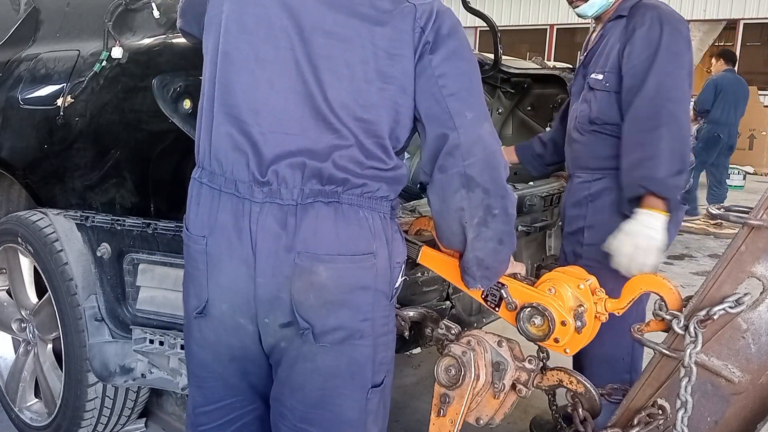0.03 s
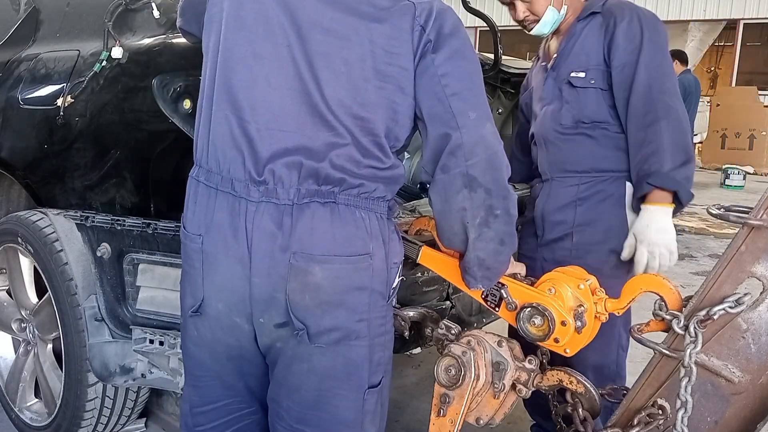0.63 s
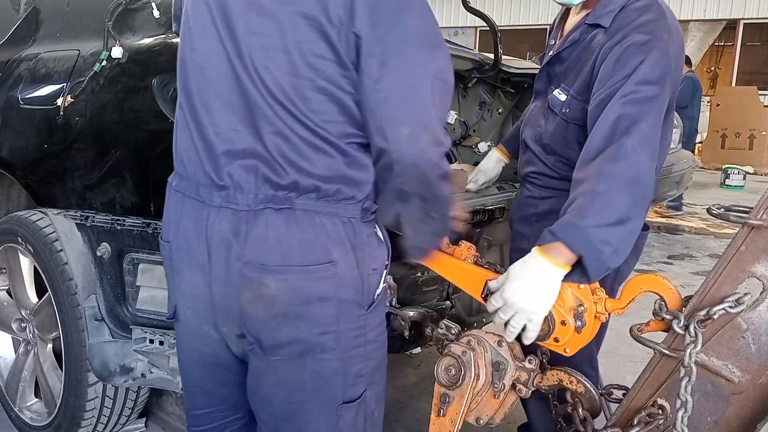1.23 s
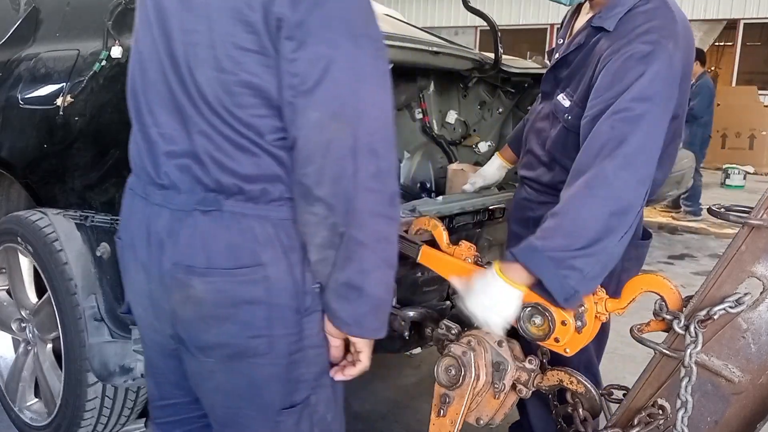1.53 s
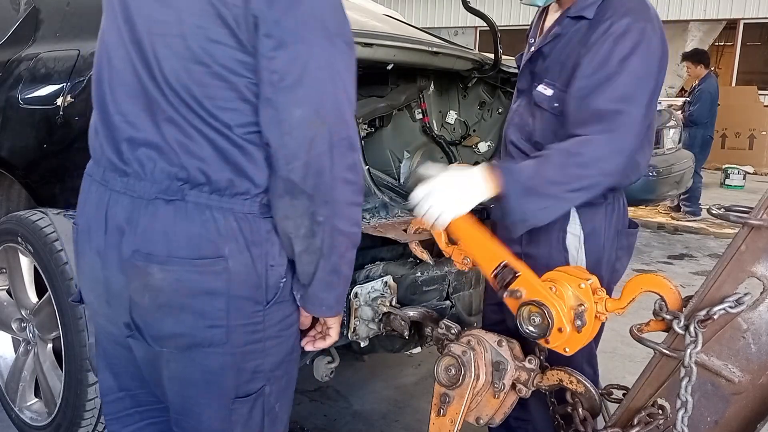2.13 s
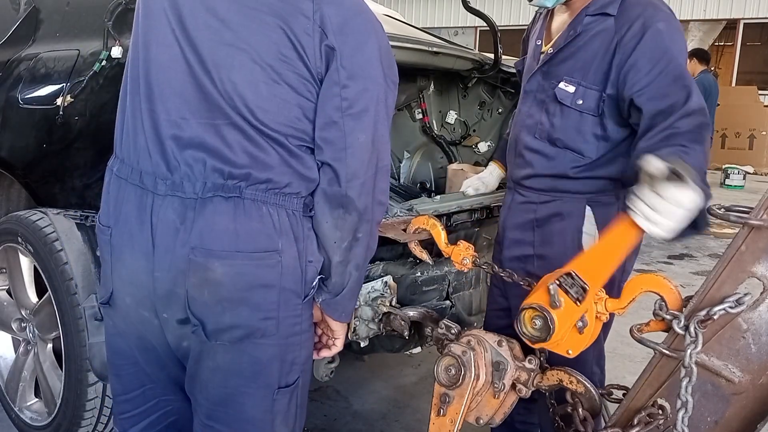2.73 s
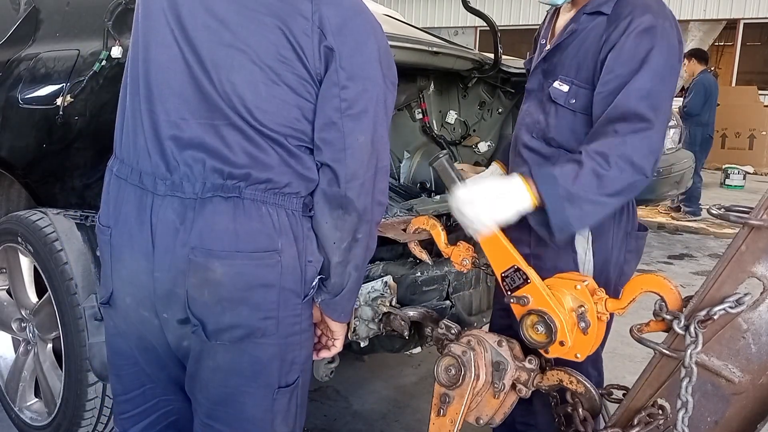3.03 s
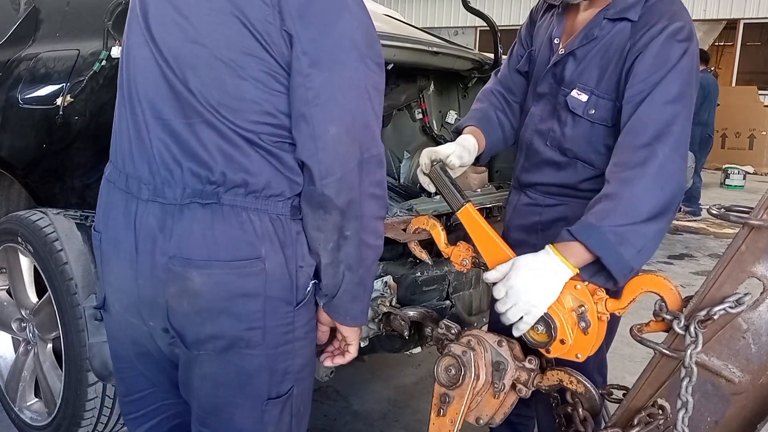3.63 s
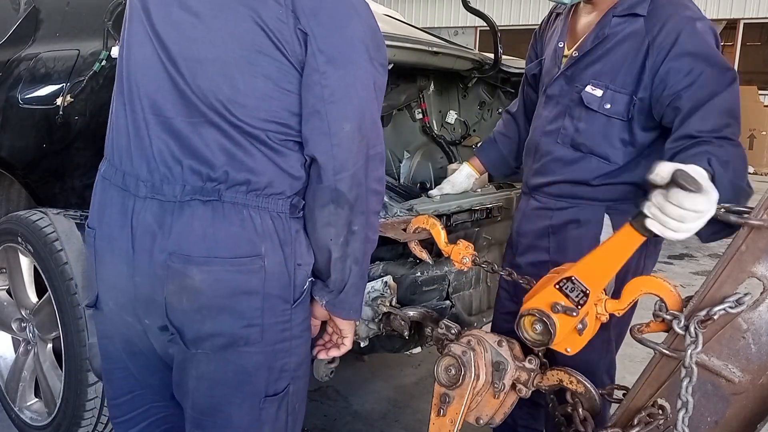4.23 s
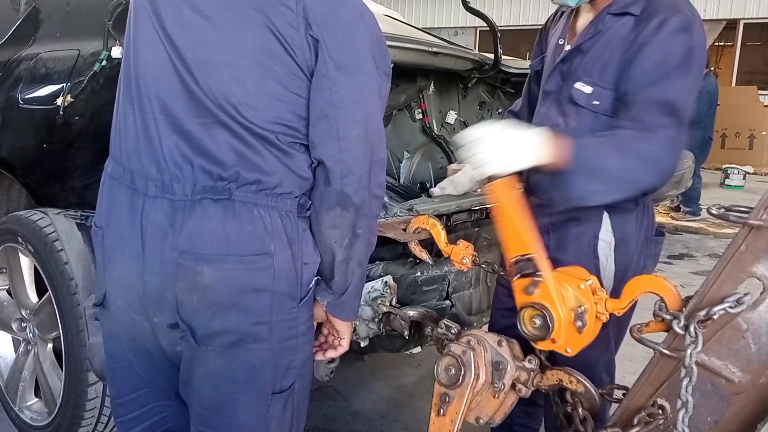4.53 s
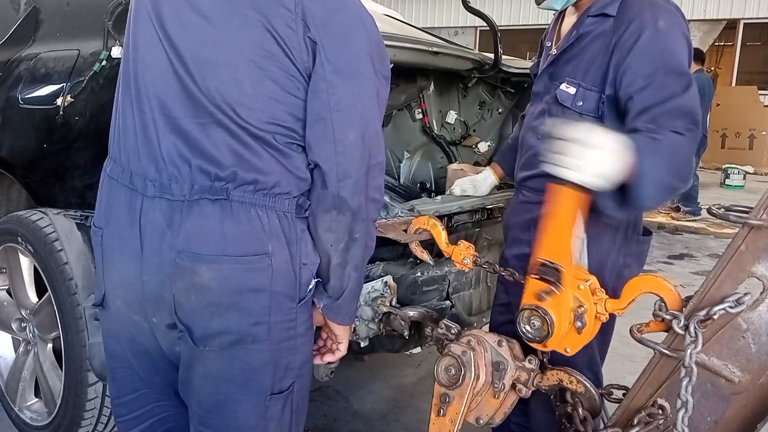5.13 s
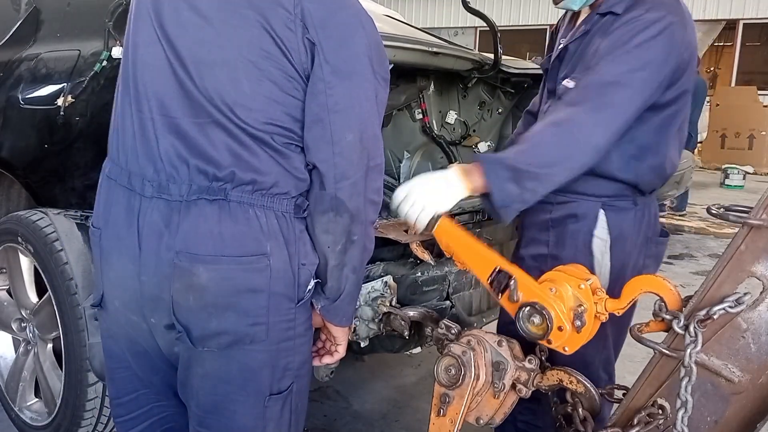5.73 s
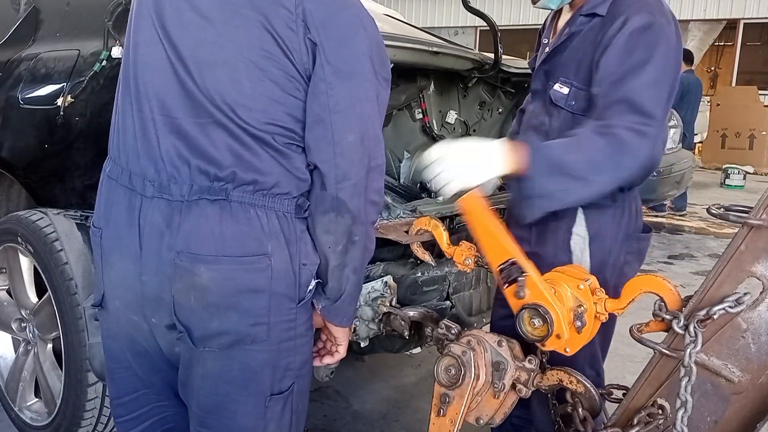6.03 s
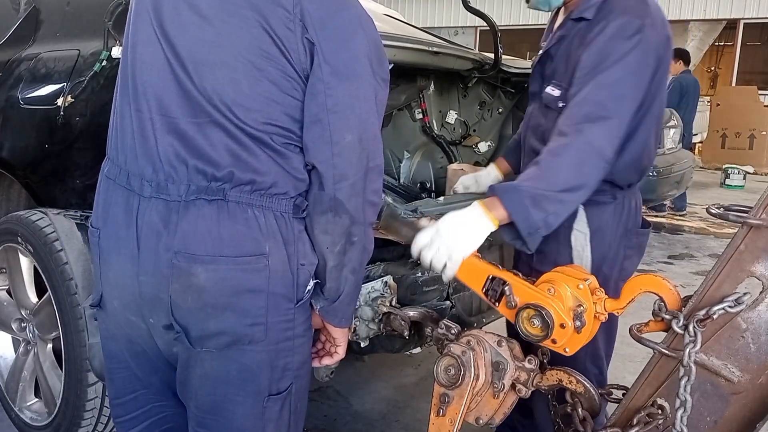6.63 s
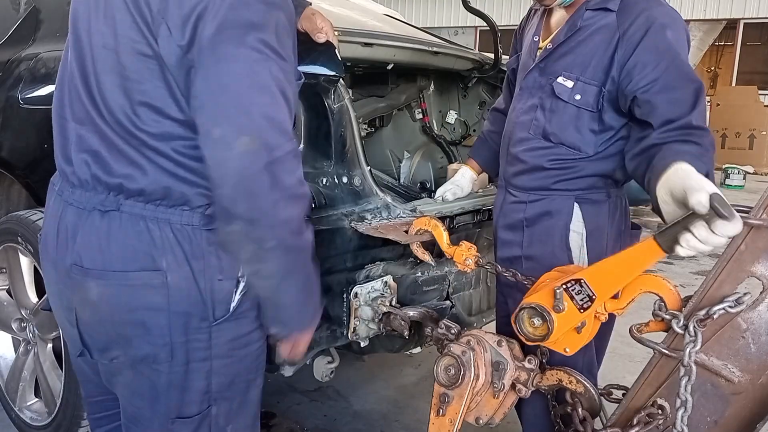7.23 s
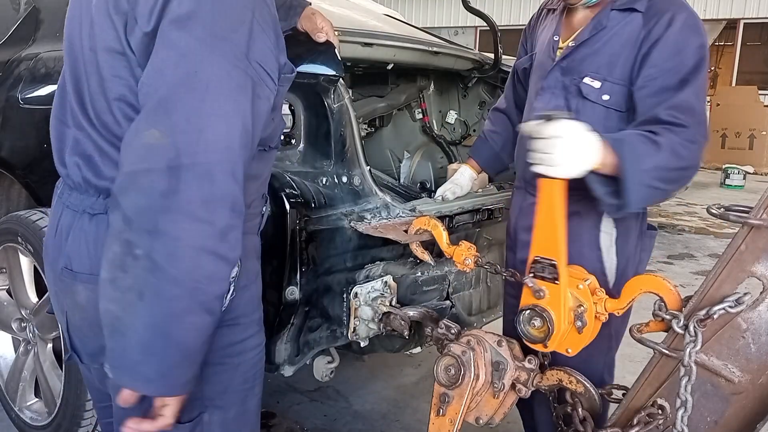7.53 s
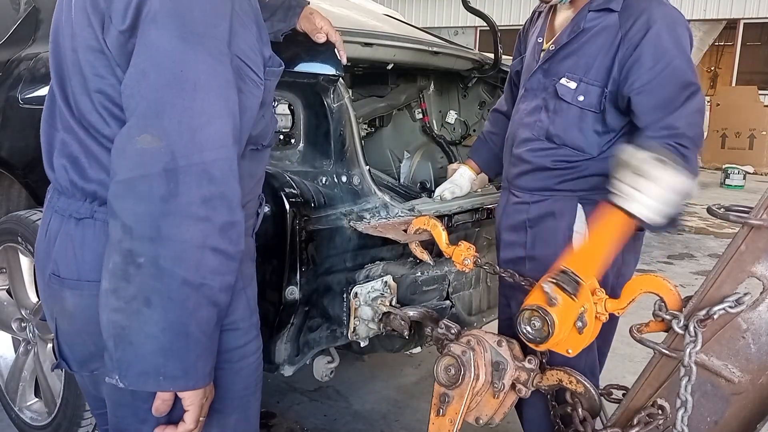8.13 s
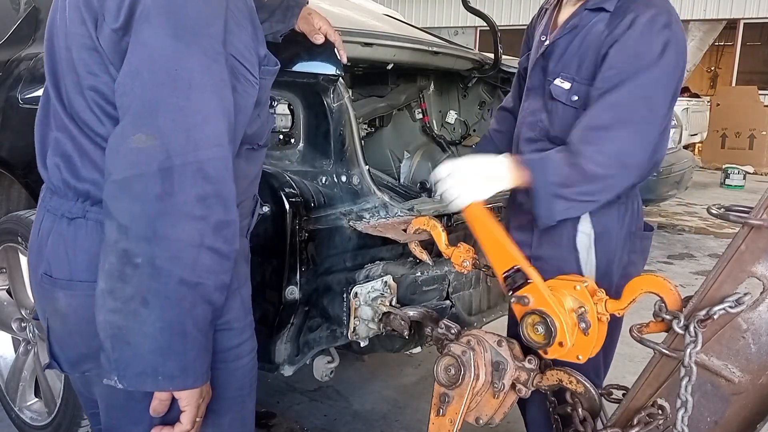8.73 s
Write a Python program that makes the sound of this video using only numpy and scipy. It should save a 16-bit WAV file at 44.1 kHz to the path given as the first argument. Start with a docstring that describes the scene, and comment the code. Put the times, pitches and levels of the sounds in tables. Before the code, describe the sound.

Over the steady drone of a workshop fan, distant hammer blows on sheet metal come in small groups. A hand hoist beside the microphone starts ratcheting in irregular bursts of clicks and gritty rubs, with occasional dull thuds and two thin squeaks. Compressed air hisses for a few seconds, the hammering stops, and three chattering steel clangs ring through the hall while the ratchet keeps clicking.

```python
"""A lever hoist is cranked close by in a car body shop: its pawl snaps over the ratchet teeth in short,
uneven runs, and steel rubs on steel as the lever swings. Further off in the hall a hammer beats a
sheet-metal panel, and later a loose steel part clangs three times and chatters.
Soft, heavy contacts give a few dull knocks, and dry metal sticks and slips in two thin squeaks.
A fan drones throughout, and compressed air hisses while a valve is open."""
import sys
import numpy as np
from scipy import signal
from scipy.fft import rfft, irfft, next_fast_len
from scipy.io import wavfile
from scipy.ndimage import uniform_filter1d

SR = 44100
rng = np.random.default_rng(int(sys.argv[2]) if len(sys.argv) > 2 else 0)


def generate_wav(signal):
    """Clip the signal to [-1, 1] and save it as 16-bit WAV at the path in sys.argv[1]."""
    frames = np.transpose(np.atleast_2d(signal))
    scaled = np.clip(frames, -1, 1) * 32767
    pcm = np.round(scaled).astype(np.int16)
    wavfile.write(sys.argv[1], SR, pcm)


N = 396018


def undb(db):
    """Decibels to gain."""
    return 10 ** (np.asarray(db) / 20)


def unit(x):
    """Scale to rms 1."""
    return x / np.sqrt(np.mean(x ** 2))


def along(hz, points):
    """Read (Hz, value) points on a log-frequency axis."""
    f, value = np.transpose(points)
    return np.interp(np.log(hz + 1), np.log(f), value)


def bins(size):
    """Frequencies of a spectrum of size samples."""
    return np.arange(size // 2 + 1) * SR / size


def vibration(size, colour, modes=()):
    """Countless modes in random phase, rms 1, with a few (Hz, width Hz, dB) resonances standing out."""
    hz = bins(size)
    peaks_db = sum(peak / (1 + (2 * (hz - f) / width) ** 2) for f, width, peak in modes)
    phases = np.exp(2j * np.pi * rng.random(len(hz)))
    return unit(irfft(undb(along(hz, colour) + peaks_db) * phases, size))


def eq(x, points):
    """Shape the tone with (Hz, dB) points."""
    return irfft(rfft(x) * undb(along(bins(len(x)), points)), len(x))


def fade(t, t60):
    """Hold at full level until t = 0, then decay exponentially."""
    return np.exp(-np.log(1000) * np.maximum(t, 0) / t60)


def swell(t, rise):
    """Smooth attack over about rise seconds."""
    return 1 - np.exp(-(t / max(rise, 1e-4)) ** 2)


def wander(size, rate):
    """Glide to a new random value every 1 / rate s; rms 1."""
    step = max(int(SR / rate), 1)
    held = np.repeat(rng.standard_normal(size // step + 1), step)
    return unit(uniform_filter1d(held, step)[:size])


def rattle(size, rate, depth_db):
    """Uneven metal contact: the force jumps from one tiny impact to the next."""
    return unit(undb(depth_db * wander(size, rate)))


def add(track, s, sound):
    """Mix a sound in at time s."""
    i = int(s * SR)
    track[i:i + len(sound)] += sound[:N - i]


# reverb time of the hall: (frequency [Hz], t60 [s])
HALL_T60 = [(100, 0.51), (400, 0.68), (1500, 0.79), (4000, 0.81), (8000, 0.37), (15000, 0.41)]

def hall(x):
    """Let a vibration die away in the hall, octave by octave: the top end goes first."""
    t, spectrum = np.arange(len(x)) / SR, rfft(x)
    centres = 62.5 * 2 ** np.arange(9)
    octave = np.log2(np.clip(bins(len(x)), centres[0], centres[-1]))
    out = np.zeros(len(x))
    for hz in centres:
        band = np.maximum(1 - abs(octave - np.log2(hz)), 0)
        out += irfft(spectrum * band, len(x)) * fade(t, along(hz, HALL_T60))
    return out


# tone of the fan: (frequency [Hz], level [dB])
FAN_COLOUR = [(30, -17), (120, -12), (205, -15.5), (300, -6.5), (376, 6.5), (430, -5.5), (570, -8),
              (1000, -17), (1200, -20.5), (2000, -22), (6300, -19.5), (8000, -26), (13500, -31),
              (16000, -28)]
# duct resonances: (frequency [Hz], width [Hz], boost [dB])
DUCT_MODES = [(484, 39, 9.5), (1400, 78, 8.5), (2920, 130, 12.5), (6660, 690, 8), (9300, 830, 8)]

def fan(level_db=-46.5):
    """A fan drones in its duct: a steady bed under the scene."""
    return vibration(next_fast_len(N, True), FAN_COLOUR, DUCT_MODES)[:N] * undb(level_db)


# air jets: (valve opens [s], valve closes [s], level [dB])
AIR_JETS = [(0, 3.3, -63), (1.0, 3.62, -54), (4.575, 7.245, -41)]
# tone of the hiss: (frequency [Hz], level [dB])
AIR_COLOUR = [(50, -33), (200, -9), (800, -5), (2000, -15), (4000, -7.5), (6600, 2), (8000, -3), (9500, 1),
              (11500, -9.5), (14000, -6), (16000, -3)]

def compressed_air():
    """A fluttering hiss builds as the valve opens and dies as the hose empties."""
    t = np.arange(N) / SR
    jets = [undb(db) * swell(np.maximum(t - opens, 0), rise=0.03) * fade(t - closes, t60=0.2)
            for opens, closes, db in AIR_JETS]
    flow = np.linalg.norm(jets, axis=0)  # overlapping jets add in power
    flutter = undb(0.67 * wander(N, rate=8.2))
    return vibration(next_fast_len(N, True), AIR_COLOUR)[:N] * flow * flutter


def struck_spot(x, spacing_hz, depth_db):
    """The spot that is struck favours some groups of modes and misses others."""
    count = int(SR / spacing_hz)
    db = np.interp(bins(len(x)), np.linspace(0, SR, count), depth_db * rng.standard_normal(count))
    return unit(irfft(rfft(x) * undb(db), len(x)))


# hammer hits, voiced by the spot struck: (time [s], level [dB], boom trim [dB], crack trim [dB])
BLOWS = [(0.0568, -24.5, -3.5, 0.5), (0.2423, -25.5, 2, 3), (0.4279, -28.5, 3, 4.5), (2.0255, -22, 1, -3),
         (2.213, -22, -1.5, -4), (2.3536, -21.5, -1.5, -3.5), (2.66, -24, -1, 2.5),
         (2.9093, -23.5, -2.5, 2), (3.0489, -25.5, -2, 3), (3.186, -21.5, -1.5, -4.5), (3.7, -26, -7, -1),
         (3.977, -20.5, -7.5, -4), (4.226, -21.5, -6.5, -0.5), (4.275, -23.5, -8, -2.5),
         (4.9566, -23.5, 0, 0.5), (5.1382, -24, 1.5, 0), (5.3509, -25.5, 4.5, 3.5), (5.6199, -25.5, 0, 0),
         (5.7716, -21.5, -2.5, -7), (5.9828, -22.5, -2, 0.5)]
# tone of the sheet metal: (frequency [Hz], level [dB])
PANEL_COLOUR = [(21, -51), (35, -13.5), (140, -3), (301, 1), (431, -3), (529, -3.5), (702, -12),
                (1060, -14), (1270, -16), (2220, -15), (6360, -19.5), (9580, -26.5), (13000, -46),
                (14800, -37), (16000, -40)]
# panel resonances: (frequency [Hz], width [Hz], boost [dB])
PANEL_MODES = [(146.3, 23, 10.5), (212, 33, 5.5), (281, 39, 5), (356, 17, 3.5), (437, 61, -5),
               (485, 19, 0.5), (650, 37, 4), (766, 36, 5), (871, 41, 6.5), (962, 63, 2), (980, 15, 2.5),
               (1071, 40, 7.5), (1530, 45, 4), (1660, 38, 5.5), (2280, 140, 2.5), (3070, 280, 1),
               (6300, 510, 5)]

def hammer(size=32768, attack_s=0.0064):
    """Each blow cracks, the panel swells and booms a little later, and its ring hangs in the hall."""
    out, t = np.zeros(N), np.arange(size) / SR
    crack_colour = [(100, -25), (500, -34), (2000, 3), (4000, 7.5), (7000, 1),
                    (10000, -3.5), (16000, -20)]
    boom_colour = [(30, -40), (70, -21), (130, 3.5), (300, 10.5), (700, -40), (2000, -45)]
    for s, db, boom_db, crack_db in BLOWS:
        start = s - attack_s / 2  # the blow builds up around its time
        bright_hz = 2870 * 2 ** (0.2 * rng.standard_normal())  # moves with the spot that is struck
        bright_mode = [(bright_hz, 260, 4)]
        panel = vibration(size, PANEL_COLOUR, PANEL_MODES + bright_mode)
        panel = struck_spot(panel, spacing_hz=45, depth_db=2.7)
        panel = eq(panel, [(220, boom_db + 2), (600, 6.1), (1400, 6.8), (3500, crack_db + 6.5)])
        panel *= rattle(size, rate=160, depth_db=1.6)
        add(out, start, hall(panel) * swell(t, attack_s) * undb(db - 1.88))
        crack = vibration(size, crack_colour, bright_mode) * rattle(size, rate=1200, depth_db=2.5)
        crack *= swell(t, attack_s / 2) * fade(t, t60=0.067)
        add(out, start, crack * undb(db + crack_db + 2.5))
        boom = vibration(size, boom_colour, PANEL_MODES) * swell(t, rise=0.01) * fade(t, t60=0.12)
        add(out, s, boom * undb(db + boom_db + 5.5))
    return out


# dull knocks: (time [s], level [dB], hollow note [Hz])
KNOCKS = [(0.8207, -19, 428), (1.798, -21.5, 500), (1.962, -28.5, 657), (3.705, -22.5, 764),
          (6.218, -31.5, 604), (6.931, -34.5, 893), (7.414, -16, 380), (7.445, -24, 560), (7.79, -25, 429),
          (8.648, -25, 470)]
# tone of the thud: (frequency [Hz], level [dB])
KNOCK_COLOUR = [(60, -11), (150, -0.5), (250, -5.5), (380, 1), (620, -8), (1000, -10), (1800, -14),
                (2500, -16), (4000, -21.5), (7000, -28), (12000, -38)]

def knocks(size=24000, contact_s=0.0046):
    """Soft, heavy contacts: a dull thud, the object's own hollow note and a weak reverb tail."""
    out, t = np.zeros(N), np.arange(size) / SR
    for s, db, hz in KNOCKS:
        body = vibration(size, KNOCK_COLOUR, [(hz, hz / 2, 7), (570, 50, 3), (1860, 60, 6)])
        body = unit(eq(body, [(hz / 2, -6), (hz * 1.44, 0), (hz * 4, -3)]))  # the EQ tracks the note
        thud = body * fade(t - contact_s, t60=0.081) * undb(-2)
        note = unit(np.sin(2 * np.pi * hz * t)) * fade(t, t60=0.03) * undb(-2.5)
        tail = hall(body) * fade(t, t60=2.2) * undb(-10)
        add(out, s, (thud + note + tail) * swell(t, rise=0.0047) * undb(db))
    return out


# swings of the lever: (time [s], length [s], rub level [dB])
SWINGS = [(1.49, 0.027, -38.5), (1.681, 0.18, -36), (4.597, 0.25, -42), (5.404, .2, -42), (6.099, .36, -44),
          (7.09, 0.066, -47), (7.226, 0.164, -38.5), (7.543, 0.019, -29.5), (7.774, 0.17, -36),
          (8.03, 0.072, -39), (8.524, 0.094, -39), (8.864, 0.0091, -35)]
# tone of rubbing steel: (frequency [Hz], level [dB])
RUB_COLOUR = [(100, 1.5), (400, 9), (800, -1.5), (1900, 2), (2400, -5), (3000, -3.5), (3600, -2.5),
              (5000, -7.5), (7000, -8), (11000, -23), (16000, -29)]

def lever_rubs(size=16384):
    """Steel drags on steel in gritty jerks as the lever takes up its slack."""
    out, t = np.zeros(N), np.arange(size) / SR
    for s, length, db in SWINGS:
        grit = vibration(size, RUB_COLOUR, [(1770, 120, 2), (2390, 120, 11), (3550, 150, 4.4)])
        grit *= rattle(size, rate=276, depth_db=0.5)
        add(out, s, grit * swell(t, rise=0.00067) * fade(t - length, t60=0.033) * undb(db))
    return out


# pawl and casing modes: (frequency [Hz], level [dB], t60 [s])
CASING_MODES = [(1106, -6.5, 0.11), (1750, -4.5, 0.16), (1920, -33, 0.028), (2280, -0.5, 0.095),
                (3000, -12.5, 0.044), (3556, -2.5, 0.083), (4130, -11, 0.089), (5370, -4, 0.046),
                (6620, 7, 0.039), (7190, 10.5, 0.0057), (7450, 13.5, 0.017), (8850, 5, 0.034),
                (9650, -3, 0.068), (10370, -3.5, 0.076), (12300, -11.5, 0.064), (14980, -20, 0.12)]

def casing(t, size=4096):
    """The hoist casing rings briefly; each snap stirs its modes in different proportions."""
    hz, db, t60 = np.transpose(CASING_MODES)[:, :, None]
    gain = undb(db + 4.7 * rng.standard_normal(hz.shape))
    detuned_hz = hz * (1 + 0.0014 * rng.standard_normal(hz.shape))
    phase = 2 * np.pi * (detuned_hz * t[:size] + rng.random(hz.shape))
    ring = np.sum(gain * np.sin(phase) * fade(t[:size], t60), axis=0)
    ring /= np.sqrt(np.sum(gain ** 2) / 2)  # starts at rms 1
    return np.pad(ring, (0, len(t) - size))


# tone of the pawl on a tooth: (frequency [Hz], level [dB])
PAWL_COLOUR = [(250, -11), (800, -4), (1200, 1), (2000, 5), (2900, 1), (3600, 3.5), (4800, -4), (7000, 4.5),
               (9000, -5.5), (12000, -18), (13500, -14), (16000, -23)]
SCRAPE_S = 0.005  # the pawl scrapes this long before it seats

def pawl_snap(body_db, size=16384):
    """The pawl scrapes off a tooth, seats and rebounds; the casing rings and the hall answers faintly."""
    t = np.arange(size) / SR
    scrape = vibration(size, PAWL_COLOUR) * rattle(size, rate=1500, depth_db=2)
    scrape *= fade(t - SCRAPE_S, t60=0.048) * undb(-2.5)
    tick = vibration(size, [(500, -29.5), (5000, -1), (9000, 2.5), (15000, 1.5)])
    tick *= fade(t - SCRAPE_S / 2, t60=0.016)
    since_rebound = np.maximum(t - SCRAPE_S * rng.uniform(0.41, 1.2), 0)
    ring = casing(t)
    rebound = casing(since_rebound) * swell(since_rebound, rise=0.00063) * undb(-4)
    tick *= undb(-1.3 + 0.95 * rng.standard_normal())
    seat = (scrape + tick + ring + rebound) * swell(t, rise=SCRAPE_S * 0.62)
    tail = hall(vibration(size, PAWL_COLOUR)) * swell(t, rise=0.0076) * undb(-18)
    # the jolt shakes the chain and the car body a moment later
    shudder = vibration(size, [(50, -9), (170, -6), (330, 2.5), (480, 4.5), (800, -13.5), (2000, -24)])
    shudder *= swell(t, rise=0.032) * fade(t, t60=0.25) * undb(-5.5)
    return eq(seat + tail + shudder, [(2500, body_db), (7000, 6.2), (11000, 4.6), (14000, 5)])


# clear snaps of the pawl: (time [s], level [dB])
SNAPS = [(1.514, -29), (1.698, -33.5), (1.747, -32.5), (1.778, -30.5), (1.8698, -28.5), (1.904, -34),
         (2.201, -26.5), (2.2986, -29.5), (2.7454, -32.5), (2.782, -28.5), (3.771, -29.5), (4.184, -37),
         (4.383, -28.5), (4.456, -30), (4.562, -32), (4.593, -30.5), (4.727, -32.5), (4.77, -30),
         (4.852, -29.5), (5.0937, -31.5), (5.233, -30), (5.272, -30.5), (5.311, -31.5), (5.406, -31),
         (5.6703, -30.5), (5.752, -28.5), (5.86, -33), (5.884, -33), (6.2167, -31), (6.301, -34),
         (6.334, -32.5), (6.374, -39), (6.5582, -29), (6.6049, -28), (6.676, -28), (7.255, -28.5),
         (7.399, -27.5), (8.0169, -34.5), (8.057, -29.5), (8.12, -28.5), (8.4615, -29.5), (8.4951, -29),
         (8.5964, -37.5), (8.8334, -35), (8.853, -32)]

def ratchet(usual_snap_db=-32.5, tooth_gap_s=0.065):
    """The pawl drops into a tooth with a clear snap, and rides lightly over teeth during lever swings."""
    out = np.zeros(N)
    for s, db in SNAPS:
        body_db = 4 + 0.2 * (db - usual_snap_db)  # a harder snap stirs the casing more
        add(out, s - SCRAPE_S / 4, pawl_snap(body_db) * undb(db))
    for start, length, rub_db in SWINGS:
        light_snap = pawl_snap(body_db=10)
        gaps = tooth_gap_s * np.exp(0.3 * rng.standard_normal(12))
        levels_db = rub_db - 4 + 1.5 * rng.standard_normal(12)
        for lag, db in zip(np.cumsum(gaps), levels_db):
            if lag < length:
                add(out, start + lag, light_snap * undb(db))
    return out


# dry-metal squeaks, the first two heard as one: (time [s], hold [s], pitch [Hz], level [dB])
SQUEAKS = [(3.644, 0.018, 4940, -40.5), (3.664, .04, 4950, -51), (8.5, 0.13, 5130, -53)]

def squeaks():
    """Dry metal sticks and slips at one thin, slightly unsteady pitch."""
    out = np.zeros(N)
    for s, hold, hz, db in SQUEAKS:
        t = np.arange(int(2 * hold * SR)) / SR
        pitch = hz * (1 + 0.0034 * wander(len(t), rate=300))
        tone = unit(np.sin(2 * np.pi * np.cumsum(pitch) / SR))
        add(out, s, tone * swell(t, rise=0.0023) * fade(t - hold, t60=hold) * undb(db))
    return out


# strikes on the steel part: (time [s], strike level [dB], attack [s])
CLANGS = [(7.558, -21.5, 0.0011), (8.191, -18.5, 0.001), (8.876, -19, 0.007)]
# tone of the steel part: (frequency [Hz], level [dB])
STEEL_COLOUR = [(40, -10), (90, -1), (250, -2.5), (400, 3.5), (600, -4.5), (850, -2), (1270, -8.5),
                (1720, -2.5), (2100, -7.5), (3000, -5), (4100, -1), (4900, -6), (9000, -13.5), (13000, -38)]
# its resonances: (frequency [Hz], width [Hz], boost [dB])
STEEL_MODES = [(1605, 28, 5), (1670, 30, 7), (1722, 25, 7.5), (1805, 45, 6), (2255, 35, 4), (3400, 60, 4),
               (3740, 40, 6), (3875, 45, 7), (4035, 35, 9.5), (4160, 30, 5), (4230, 45, 12),
               (4330, 45, 7.5), (4470, 80, 2)]

def steel_clangs(size=44100, chatter_s=0.14, chatter_db=-23.5):
    """A hard strike, then the loose part chatters and keeps its modes ringing until the hall takes over."""
    out, t = np.zeros(N), np.arange(size) / SR
    held = int(chatter_s * SR)
    for s, db, attack in CLANGS:
        strike = vibration(size, STEEL_COLOUR, [(3960, 460, 6.5), (7360, 10000, 4), (14200, 7100, 26)])
        add(out, s, strike * swell(t, attack) * fade(t - attack - 0.009, t60=0.096) * undb(db))
        chatter = vibration(size, STEEL_COLOUR, STEEL_MODES) * rattle(size, rate=76.5, depth_db=1.43)
        tail = hall(np.roll(chatter, -held))[:size - held]  # picks up where the chatter stops
        ring = np.concatenate([chatter[:held], tail])
        add(out, s, ring * swell(t, rise=0.0015) * undb(chatter_db))
    return out


def scene():
    """The mono mix, heard from one spot beside the hoist."""
    hoist = ratchet() + lever_rubs()
    shop = hammer() + steel_clangs() + knocks() + squeaks()
    bed = fan() + compressed_air()
    return (hoist + shop + bed)[None]


def record(dry):
    """The microphone sheds deep bass and its port resonates at 15 kHz; above 16 kHz the sound is cut."""
    response = [(25, -17), (40, -8), (65, 0.5), (11000, -0.5), (13500, -6), (15000, 6), (16000, -7)]
    high_cut = signal.ellip(10, 0.2, 70, 16000, fs=SR, output="sos")
    return signal.sosfilt(high_cut, eq(dry[0], response))[None]


dry = scene()
out = record(dry)
generate_wav(out)
```